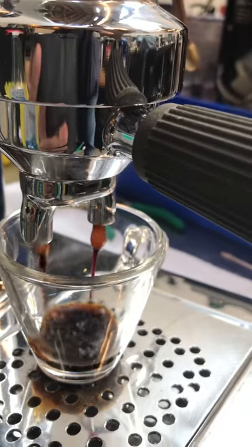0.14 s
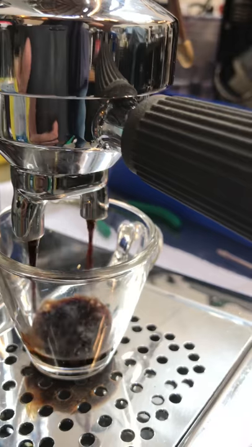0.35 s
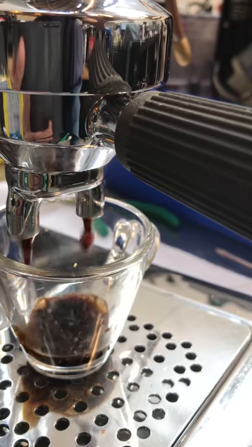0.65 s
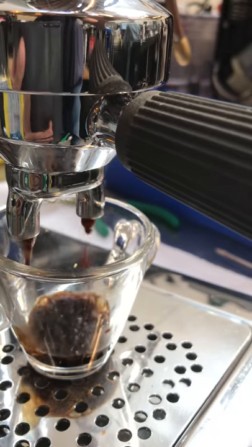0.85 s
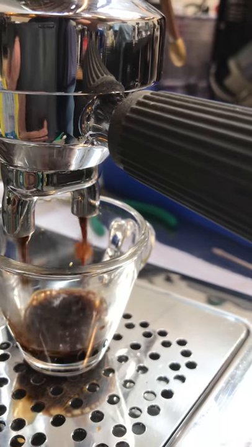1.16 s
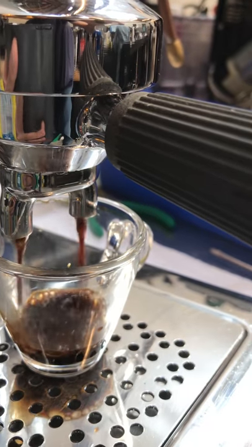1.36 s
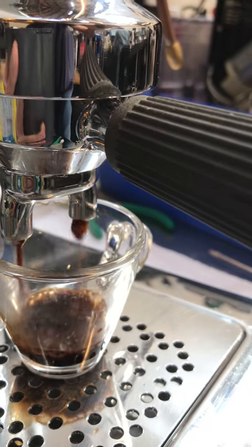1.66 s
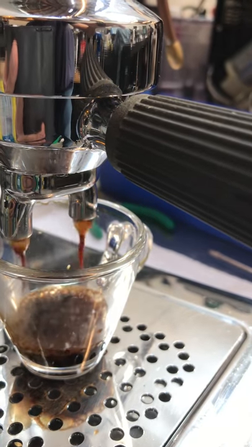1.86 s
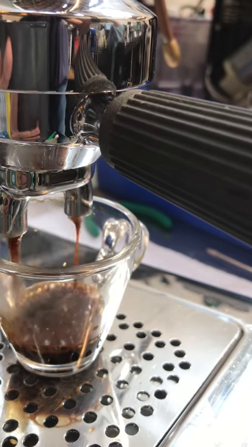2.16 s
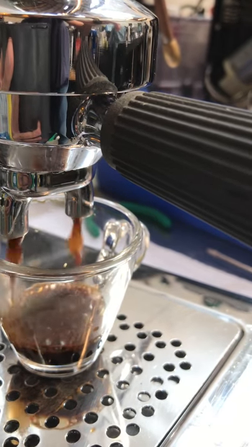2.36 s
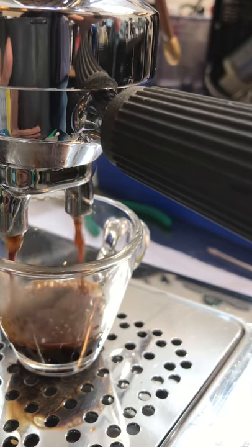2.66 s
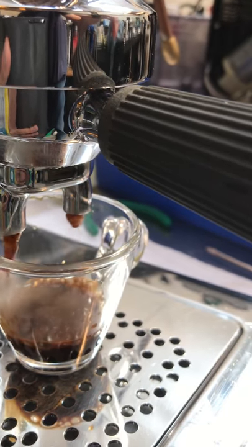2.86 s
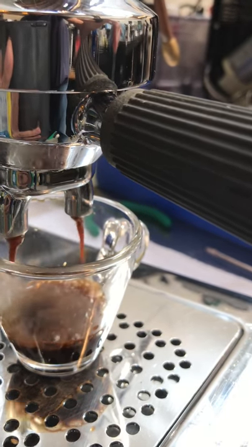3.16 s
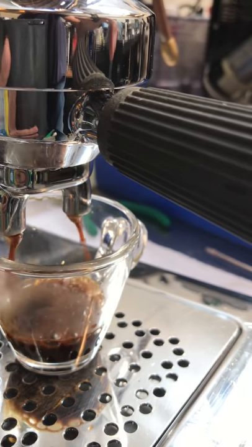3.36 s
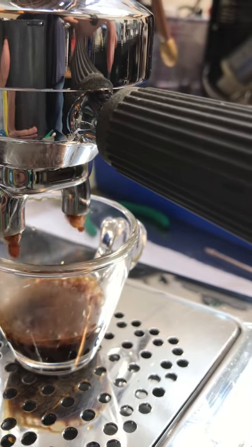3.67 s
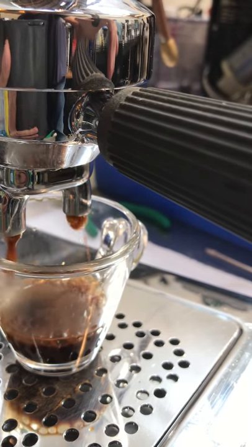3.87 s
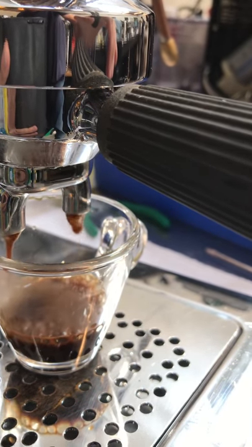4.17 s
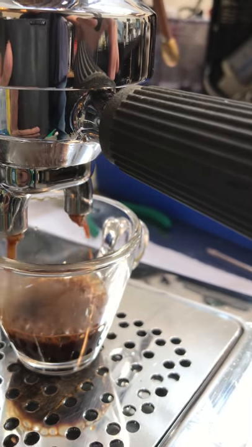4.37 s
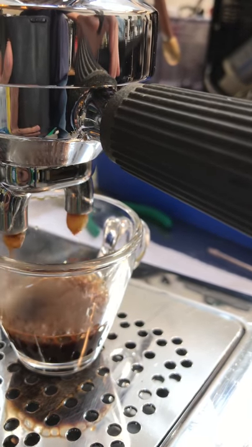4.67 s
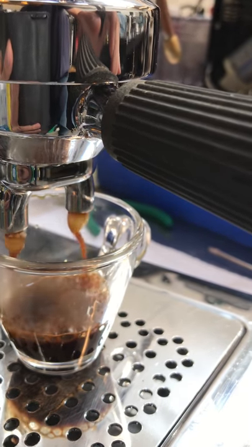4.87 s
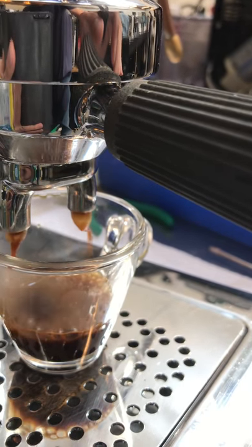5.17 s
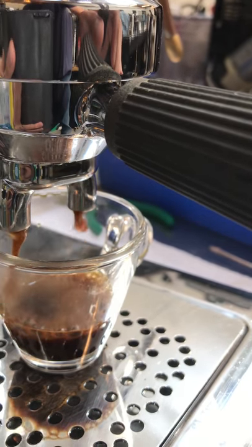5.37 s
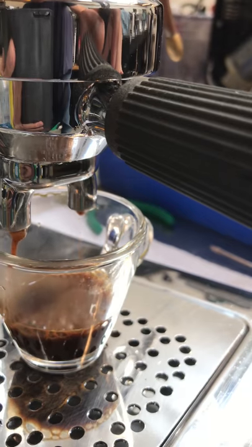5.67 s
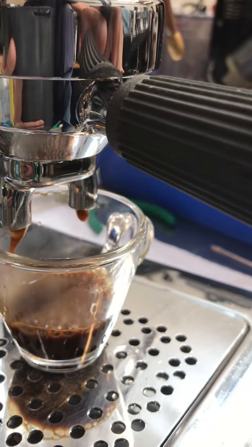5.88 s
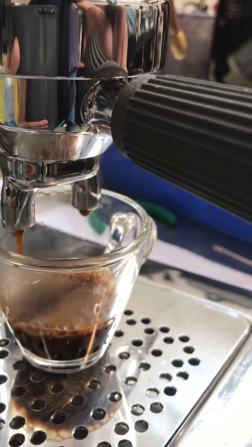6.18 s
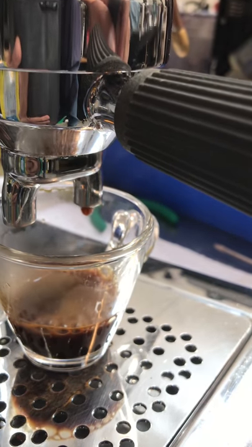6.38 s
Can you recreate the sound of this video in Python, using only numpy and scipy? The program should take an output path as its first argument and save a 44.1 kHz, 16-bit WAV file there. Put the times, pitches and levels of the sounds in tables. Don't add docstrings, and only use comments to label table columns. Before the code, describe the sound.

A phone microphone sits beside a glass catching coffee from two spouts: bright watery plinks, tiny splashes and crackling foam. Three quick air-gun bursts come early from farther off, the third longest and strongest. After a light tap, a low, boxy lid slam rings through the workshop. The dripping continues, gradually quieter and finer, over low ventilation, with a dull distant bump near five seconds and another near the end.

```python
import sys
import numpy as np
from scipy import signal
from scipy.fft import rfft, irfft, next_fast_len
from scipy.io import wavfile
from scipy.ndimage import uniform_filter1d, map_coordinates

SR = 44100
rng = np.random.default_rng(int(sys.argv[2]) if len(sys.argv) > 2 else 0)


def generate_wav(sig):
    pcm = np.round(np.clip(np.atleast_2d(sig).T, -1, 1) * 32767).astype(np.int16)
    wavfile.write(sys.argv[1], SR, pcm)


def invert_db(x):
    u = np.asarray(x, float) / 20
    return 10 ** u


N = 287973


def unit(x):
    return x / np.sqrt(np.mean(x ** 2) + 1e-20)


def along(points, hz):
    f, v = np.transpose(points)
    return np.interp(np.log(hz + 1), np.log(f + 1), v)


def curves(rows):
    s, *cols = np.transpose(rows)
    return [np.interp(np.arange(N) / SR, s, c) for c in cols]


def wobble(rate_hz):
    knots = rng.standard_normal(int(N * rate_hz / SR) + 4)
    return map_coordinates(knots, [np.arange(N) * rate_hz / SR])


def filtered(x, response):
    size = next_fast_len(N + SR // 2)
    spectrum = rfft(x, size) * response(np.fft.rfftfreq(size, 1 / SR))
    return irfft(spectrum, size)[:N]


def resonances(modes):
    def response(f):
        total = 0
        for k, (hz, width_hz, db) in enumerate(modes):
            damping = 1j * f * width_hz
            total = total + (-1) ** k * invert_db(db) * damping / (hz * hz - f * f + damping)
        return total
    return response


def rush(spectrum, patchy_db):
    z = signal.stft(rng.standard_normal(N + 512), nperseg=512)[2]
    field = uniform_filter1d(rng.standard_normal(z.shape), 5, axis=0)
    field = uniform_filter1d(field, 12, axis=1)
    noise = signal.istft(z * invert_db(patchy_db * unit(field)), nperseg=512)[1][:N]
    return unit(filtered(noise, lambda hz: invert_db(along(spectrum, hz))))


def placed(start_s, rows):
    index = np.round(start_s * SR).astype(int)[:, None] + np.arange(rows.shape[1])
    return np.bincount(index.ravel(), rows.ravel(), N + SR)[:N]


def bubbles(hz, t60_s, rise_s, climb, size=1300):
    t = np.arange(size) / SR
    phase = 2 * np.pi * hz[:, None] * (t + climb * t ** 2 / 2)
    return np.sin(phase) * invert_db(-60 * t / t60_s[:, None]) * (1 - np.exp(-t / rise_s))


def struck(parts):
    s, hz, db, t60_s, rise_s = np.transpose(parts)
    modes = bubbles(hz, t60_s, np.abs(rise_s[:, None]) + 1e-4, climb=0, size=SR // 3)
    return placed(s, invert_db(db)[:, None] * modes)


# frequency in Hz, t60 in seconds.
ROOM_T60 = [(100, 0.97), (300, 0.78), (1000, 0.8), (2500, 0.79), (6000, 0.61), (14000, 0.34)]


def room(x):
    hz, t, z = signal.stft(rng.standard_normal(SR), SR, nperseg=256)
    decay = invert_db(-60 * t / along(ROOM_T60, hz)[:, None])
    tail = rfft(signal.istft(z * decay, SR, nperseg=256)[1])
    tail = irfft(tail / np.sqrt(uniform_filter1d(np.abs(tail) ** 2, size=40)))
    delayed = np.pad(x, (400, 0))
    return signal.fftconvolve(delayed, tail[:SR - 4000] / np.linalg.norm(tail))[:N]


# time in seconds, level in dB.
TRICKLE_LEVEL = [(0, -62), (1.5, -75.5), (2.4, -72.5), (3.5, -81), (4.5, -82), (5.6, -77), (6.53, -87)]


def trickle(drop_s, drop_db, count=2000):
    chance = rng.random((count, 6))
    share = np.cumsum(invert_db(drop_db / 2))
    parent = np.searchsorted(share, chance[:, 4] * share[-1])
    near_s = drop_s[parent] + .07 * (chance[:, 0] - .3)
    s = np.where(chance[:, 5] < .5, near_s, chance[:, 0] * N / SR)
    hz = (3700 + 110 * s) * np.exp(1.3 * chance[:, 1] ** 3)
    size = invert_db(-4.6 * np.log(chance[:, 2] + .07)) * 4000 / hz
    t60_s = (12 + 25 * chance[:, 3]) / hz
    grains = size[:, None] * bubbles(hz, t60_s, rise_s=0.00021, climb=28, size=400)
    return invert_db(curves(TRICKLE_LEVEL)[0] + 0.37 * wobble(27)) * unit(placed(s, grains))


# frequency in Hz, density in dB per Hz.
RUMBLE_SPECTRUM = [(15, -28), (26, -3), (121, 0.5), (138, -2.5), (161, -5), (177, -11), (225, -6),
                   (300, -15), (385, -15.5), (450, -39), (580, -42), (990, -120)]
# frequency in Hz, density in dB per Hz.
HISS_SPECTRUM = [(240, -33), (400, 3), (786, -2.5), (945, -0.5), (1140, -3.5), (2070, -6), (2770, -10),
                 (4390, -10), (8110, -17), (10500, -18.5), (11900, -19), (15700, -22)]
# time in seconds, rumble in dB, hiss in dB.
VENT_LEVEL = [(0, -54, -63.5), (2, -55, -62), (4, -54, -64), (6.53, -53.5, -65)]
# frequency in Hz, width in Hz, level in dB.
DUCT_BANDS = [(224, 34, -70.5), (921, 41, -76.5), (1720, 36, -80)]
# multiple of twice the mains frequency, level in dB.
BUZZ_HARMONICS = [(5, -78), (8, -79.5), (9, -83.5), (11, -79.5), (12, -78.5), (17, -83.5)]
# start in seconds, frequency in Hz, level in dB, t60 in seconds, rise in seconds.
FAR_BUMPS = [
    (1.275, 1533, -43.5, 0.05, 0.0048),
    (4.985, 900, -52, 0.2, 0.023),
    (6.33, 937, -45.5, 0.12, 0.016),
]


def workshop():
    t = np.arange(N) / SR
    buzz_base_hz = 120.04
    rumble_db, hiss_db = curves(VENT_LEVEL)
    out = invert_db(rumble_db) * rush(RUMBLE_SPECTRUM, patchy_db=0.7)
    out = out + invert_db(hiss_db + .6 * wobble(3.46)) * rush(HISS_SPECTRUM, patchy_db=1.3)
    for hz, width_hz, db in DUCT_BANDS:
        band = filtered(rng.standard_normal(N), resonances([(hz, width_hz, 0)]))
        out = out + invert_db(db + 2.1 * wobble(7)) * unit(band)
    for k, db in BUZZ_HARMONICS:
        cycles = round(k) * buzz_base_hz * t + .15 * wobble(9)
        out = out + invert_db(db + 2.5 * wobble(5)) * np.sin(2 * np.pi * cycles)
    bumps = struck(FAR_BUMPS) * wobble(700)
    return out + bumps + invert_db(-1.5) * room(bumps)


# start in seconds, hold in seconds, level in dB, whistle in dB.
GUN_PUFFS = [
    (0.057, 0.031, -40.5, -53),
    (0.366, 0.041, -46.5, -58),
    (0.58, 0.056, -38.5, -80),
]
# frequency in Hz, density in dB per Hz.
JET_SPECTRUM = [(530, -56), (900, -26), (1620, -20), (1740, -17), (2100, -10.5), (2290, -3.5), (3010, -8.5),
                (4060, 0), (4800, -5.5), (5350, -2), (7040, -9.5), (8630, -7.5), (10300, -3), (11400, -8),
                (15700, -15.5)]
# frequency in Hz, width in Hz, level in dB.
NOZZLE_MODES = [(8600, 320, 0.5), (12500, 350, -12), (6150, 490, -1), (4250, 370, -6)]
# time in seconds, level in dB.
GUN_LEAKS = [
    (2.52, -69),
    (5.16, -71),
    (6.08, -74),
]


def air_gun():
    rise_db_s, fall_db_s, whistle_fall_db_s, leak_db_s = 602, 219, 137, 182
    swell_db_s = 26
    open_treble_db, dulling = 4.5, 2.9
    seep_db, seep_end_s = -64.5, 0.34
    t = np.arange(N) / SR
    jet = rush(JET_SPECTRUM, patchy_db=2)
    jet = jet + filtered(jet, resonances(NOZZLE_MODES))
    treble = filtered(jet, lambda hz: 1 / (1 + (8000 / (hz + 1)) ** 6))
    whistle = unit(filtered(rng.standard_normal(N), resonances([(6300, 150, 0)])))
    flow = invert_db(seep_db) * (t < seep_end_s) * jet
    tone = 0
    for s, held_s, db, whistle_db in GUN_PUFFS:
        early = np.clip(s - t, 0, None)
        late = np.clip(t - s - held_s, 0, None)
        held = np.clip(t - s, 0, held_s)
        treble_db = np.clip(open_treble_db - dulling * fall_db_s * late, -15, None)
        puff_db = db - rise_db_s * early + swell_db_s * held - fall_db_s * late
        flow = flow + invert_db(puff_db) * (jet + (invert_db(treble_db) - 1) * treble)
        tone = tone + invert_db(whistle_db - rise_db_s * early - whistle_fall_db_s * late)
    leaks = sum(invert_db(db - leak_db_s * np.abs(t - s)) for s, db in GUN_LEAKS)
    return invert_db(0.95 * wobble(61.9)) * flow + leaks * jet + tone * whistle


# start in seconds, level in dB, bubble in Hz, second bubble in Hz, spray in dB.
TWIN_DROPS = [(.1227, -22.5, 3880, 2760, -45), (.2357, -17.5, 2790, 3900, -44),
              (.3063, -27.5, 4900, 8600, -45), (.5203, -25, 3760, 2600, -60),
              (.5854, -15.5, 4400, 2670, -41), (1.1424, -20.5, 4330, 5600, -50),
              (1.2272, -24, 3630, 4670, -69), (1.3132, -15.5, 2270, 6530, -52),
              (1.542, -28.5, 4650, 3130, -76), (1.6338, -32.5, 4600, 3320, -46),
              (1.6542, -27.5, 2460, 4930, -64), (1.6909, -34, 2430, 4040, -60),
              (2.1424, -27, 2830, 4860, -61), (2.1476, -30.5, 3080, 5540, -59),
              (2.2713, -26, 5100, 3900, -34), (2.7126, -35.5, 6560, 5840, -41),
              (2.9558, -28, 4270, 2650, -53), (3.1172, -29.5, 3830, 4740, -57),
              (3.2379, -26, 4760, 8300, -41), (3.3811, -31.5, 4040, 5000, -68),
              (3.4646, -33, 7500, 5900, -53), (4.301, -32, 6660, 3020, -49), (4.945, -29, 4730, 8140, -61),
              (6.29, -31.5, 7450, 4270, -46)]
# start in seconds, level in dB, bubble in Hz, spray in dB.
PLINK_DROPS = [(.33, -15, 2440, -70), (.3941, -38.5, 3510, -52), (.5705, -15.5, 4200, -46),
               (0.9786, -28.5, 4470, -44), (1.0472, -28, 4500, -70), (1.3639, -28, 5820, -71),
               (1.9382, -36.5, 6160, -62), (2.029, -40.5, 4400, -55), (2.3128, -33.5, 4650, -73),
               (2.3329, -34.5, 4130, -71), (2.537, -37.5, 2540, -56), (2.5911, -32, 4700, -67),
               (2.7436, -34, 4750, -52), (2.8226, -31, 4380, -75), (3.2121, -19.5, 4650, -47),
               (3.232, -29, 4040, -64), (3.5277, -29.5, 4550, -52), (3.6014, -39.5, 7240, -67),
               (3.7487, -37.5, 4300, -52), (4.284, -41, 4100, -58), (4.5638, -26, 2180, -54),
               (4.7836, -44, 4650, -61), (5.068, -39.5, 2350, -60), (5.2218, -27, 4650, -65),
               (5.362, -38, 5500, -60), (5.4343, -41, 4340, -52.5), (5.5955, -31, 4350, -64),
               (5.6958, -25.5, 4780, -71), (6.241, -39.5, 2570, -63)]
# start in seconds, level in dB, bubble in Hz.
SHALLOW_DRIPS = [(.3213, -27.5, 3740), (.8461, -35, 3600), (.9057, -37.5, 4680), (1.3846, -34, 3780),
                 (1.446, -43.5, 4210), (1.4627, -46.5, 5130), (1.5023, -35, 3920), (1.7039, -42, 4610),
                 (1.7767, -34, 4500), (2.1052, -42, 6610), (2.1337, -49, 2210), (2.1698, -36, 3750),
                 (2.191, -39.5, 3650), (2.1983, -36, 3950), (2.219, -44, 4300), (2.2495, -43.5, 4700),
                 (2.297, -35.5, 4570), (2.3015, -40, 4200), (2.4135, -52, 8800), (2.3449, -46.5, 3130),
                 (2.5582, -40, 3500), (2.7335, -38, 3930), (2.7767, -37, 4570), (2.7862, -37, 3700),
                 (3.1117, -40.5, 3930), (3.2623, -61, 3930), (3.2978, -43.5, 4690), (3.3419, -40.5, 4740),
                 (3.3681, -39, 4250), (3.3993, -33.5, 4700)]
# start in seconds, level in dB, bubble in Hz.
FOAMY_DRIPS = [(3.7016, -45, 3900), (3.8809, -46, 4530), (3.8907, -43.5, 4800), (4.0845, -40.5, 3840),
               (4.1166, -40.5, 4650), (4.1406, -43, 4180), (4.1486, -35.5, 4280), (4.3838, -41, 3800),
               (4.4037, -46, 3930), (4.4437, -37, 4600), (4.5504, -39, 2110), (4.7594, -44.5, 4130),
               (4.965, -40.5, 4260), (4.9804, -41.5, 4200), (5.1234, -44, 4850), (5.138, -47.5, 4700),
               (5.148, -46.5, 4160), (5.285, -49, 4650), (5.4541, -41.5, 6460), (5.5599, -42.5, 4550),
               (5.5995, -36.5, 4100), (5.6798, -46, 4760), (5.6898, -39.5, 4730), (5.712, -42, 4680),
               (5.718, -42.5, 4400), (5.727, -46, 4970), (5.747, -52, 5600), (5.7689, -50, 6230),
               (6.1296, -44, 4570)]
# start in seconds, level in dB, bubble in Hz.
BRIGHT_SPITS = [(.2826, -45.5, 6950), (0.299, -32.5, 11000), (.3245, -42, 12700), (1.094, -38, 7850),
                (1.8272, -37.5, 6700), (1.9163, -29.5, 11700), (2.431, -49.5, 7360), (2.6273, -48, 6080),
                (2.8006, -34, 8700), (2.8094, -58, 11110), (2.8755, -43.5, 6840), (3.1574, -40, 9000),
                (3.288, -42.5, 7560), (3.406, -45.5, 7300), (3.5486, -38.5, 6650), (3.621, -41.5, 11900),
                (3.7527, -46, 7880), (3.7725, -45.5, 7870), (4.0371, -45.5, 8140), (4.1072, -47.5, 7900),
                (4.1705, -44, 8300), (4.1932, -50.5, 7980), (4.3266, -43.5, 8600), (4.379, -45.5, 8250),
                (4.4786, -44.5, 8600), (4.5122, -56.5, 6750), (4.5424, -40, 12200), (5.588, -42, 6550),
                (6.019, -45, 9140), (6.041, -58, 11600), (6.3229, -49, 6740)]


def all_drops():
    twin, plink, spit = (np.transpose(rows) for rows in (TWIN_DROPS, PLINK_DROPS, BRIGHT_SPITS))
    drip = np.transpose(list(SHALLOW_DRIPS) + list(FOAMY_DRIPS))
    s, db, hz = (np.concatenate([twin[k], plink[k], drip[k], spit[k]]) for k in range(3))
    second_db = np.concatenate([twin[1] - 4.5, plink[1] - 27.5, drip[1] - 7.5, spit[1] - 6.5])
    spray_db = np.concatenate([twin[4], plink[3], drip[1] - 40, spit[1] - 13])
    spread = np.exp(0.255 * rng.standard_normal(len(s)).clip(-2, 2))
    stray_hz = np.maximum(0.822 * hz, 5000) * spread
    second_hz = np.concatenate([twin[3], stray_hz[twin.shape[1]:]])
    return s, db, hz, second_db, second_hz, spray_db


def drop_bubbles(s, db, hz):
    snap_db, snap_s = 9, .0016
    large = 4500 / hz
    rough = 1 + 1.9 * uniform_filter1d(rng.standard_normal((len(hz), 1300)), size=32, axis=1)
    snap = 1 + invert_db(snap_db) * np.exp(-np.arange(1300) / SR / snap_s)
    t60_s = 0.015 * large ** 1.74 / (1 + s / 12)
    climb = (21 * large ** 1.3 / (1 + s / 4))[:, None]
    tones = bubbles(0.973 * hz, t60_s, rise_s=0.00052, climb=climb)
    return (invert_db(db - 13) / large ** 1.25)[:, None] * tones * rough * snap


def splash(s, db, t60_s, band_hz):
    t = np.arange(400) / SR
    decay = invert_db(-60 * t / t60_s) + invert_db(-20.5 - 60 * t / 0.044)
    bursts = invert_db(db)[:, None] * rng.standard_normal((len(s), 400)) * decay
    return signal.lfilter(*signal.butter(3, band_hz, "bandpass", fs=SR), placed(s, bursts))


# frequency in Hz, width in Hz, level in dB, scatter in dB.
GLASS_MODES = [(3750, 120, -27, 2), (4650, 180, 2, 15), (6270, 370, 1, 21.5)]


def drops(s, db, hz, second_db, second_hz, spray_db):
    chance = rng.standard_normal((len(s), 8))
    ring = 0
    for k, (mode_hz, width_hz, level_db, scatter_db) in enumerate(GLASS_MODES):
        gain = invert_db(level_db + scatter_db * chance[:, [k]].clip(-2, .8))
        detuned_hz = mode_hz * (1 + 0.079 * chance[:, k + 4])
        ring = ring + gain * bubbles(detuned_hz, 3.26 / width_hz + 0 * s, rise_s=0.0012, climb=2.2)
    body = invert_db(db - 27.0)[:, None] * ring
    body = body + drop_bubbles(s, db, hz) + drop_bubbles(s, second_db, second_hz)
    slap = splash(s, second_db - 0.5, t60_s=0.00095, band_hz=[3400, 7000])
    spray = splash(s, spray_db + 8, t60_s=.0045, band_hz=[6000, 13000])
    return placed(s, body) + slap + spray


# start in seconds, level in dB, bubble in Hz.
STRAY_DROPLETS = [(0.9899, -54, 4370), (0.9949, -55, 3920), (1.0036, -56.4, 4130), (1.2057, -55, 6290),
                  (1.2787, -56.8, 3920), (1.361, -43, 3750), (1.404, -54, 3750), (1.4633, -55, 4220),
                  (1.4803, -54.7, 4610), (1.5758, -56.9, 5040), (1.5923, -59.2, 4130), (1.6649, -51, 3750),
                  (1.6758, -53.4, 4570), (1.6833, -55, 3920), (1.8836, -46, 4050), (2.0041, -62, 4650),
                  (2.0188, -59.1, 4610), (2.0295, -59, 4260), (2.0944, -58.2, 4350), (2.1343, -49, 4780),
                  (2.2104, -60, 3700), (2.2603, -60, 3920), (2.379, -55, 6140), (2.3852, -56, 5080),
                  (2.4044, -56, 3320), (2.5379, -54, 3790), (2.7062, -53, 3750), (2.8315, -61, 5040),
                  (2.9465, -59, 3880), (3.0442, -60, 3700), (3.1335, -59.0, 4390), (3.174, -56, 4570),
                  (3.262, -52, 4050), (3.3146, -57.4, 4740), (3.3296, -56, 5730), (3.5047, -59.3, 3570),
                  (3.6015, -55, 4520), (3.7332, -60.4, 4690), (3.8988, -58.1, 4820), (3.9489, -60, 4520),
                  (4.125, -65, 4390), (4.2111, -66, 4310), (4.4493, -60.4, 4440), (4.5965, -59.5, 5900),
                  (4.703, -67, 4650), (4.8708, -62, 4130), (4.9082, -59, 4310), (4.9654, -50.8, 4260),
                  (4.9814, -54, 4260), (4.9968, -56, 5770), (5.0973, -58, 4650), (5.2328, -60.8, 4570),
                  (5.5672, -61.0, 4310), (5.5747, -58, 4740), (5.5949, -43.5, 4570), (5.6368, -64, 4440),
                  (5.6668, -56.8, 4740), (5.7027, -60.1, 4130), (5.7526, -61.5, 6160), (6.2998, -56, 3230)]
# start in seconds, level in dB, note in Hz.
FOAM_POPS = [(1.1041, -57.9, 7150), (1.3234, -60, 7150), (1.4558, -63, 7150), (1.9163, -38, 12190),
             (2.134, -62, 7150), (2.1425, -54, 7200), (2.161, -61.9, 7280), (2.1869, -62.5, 11500),
             (2.1999, -60, 7150), (2.8098, -58.4, 10940), (2.9467, -64.4, 9170), (3.0472, -60, 8570),
             (3.0525, -65.3, 8140), (3.0719, -62, 8440), (3.1477, -61.5, 7840), (3.5693, -58.6, 8310),
             (3.6653, -60.7, 7150), (3.8711, -64.4, 7970), (3.899, -62.0, 9260), (3.9145, -59, 7150),
             (3.9427, -63.6, 11710), (4.0006, -61.3, 7670), (4.0307, -61.8, 8140), (4.0442, -65.0, 11710),
             (4.0734, -63.9, 7920), (4.1333, -62.4, 7540), (4.2111, -63.9, 7150), (4.342, -62.8, 8700),
             (4.5126, -56, 11840), (4.5506, -58.7, 7320), (4.5718, -61.9, 8100), (4.703, -61.4, 8230),
             (4.7406, -63.9, 8570), (4.7795, -60.6, 14430), (4.8362, -60, 7970), (4.8796, -64.2, 7150),
             (4.8915, -64, 8100), (4.9082, -61, 7150), (4.9654, -61.4, 7240), (4.9868, -62.1, 8310),
             (5.0761, -63.0, 7150), (5.0958, -59, 7920), (5.3954, -60.7, 7490), (5.4049, -58, 7580),
             (5.4919, -61.9, 7450), (5.5326, -60.9, 7490), (5.5553, -63.2, 7580), (5.5954, -49, 7700),
             (5.6037, -65.1, 11760), (5.6665, -64.1, 11890), (5.769, -65, 7670), (5.8045, -62, 9090),
             (5.879, -66.0, 8740), (5.895, -64.3, 7620), (5.9643, -57, 11460), (6.0414, -58, 12100),
             (6.0896, -61, 8400), (6.1522, -60.6, 7150), (6.2734, -62.4, 7580), (6.2983, -60.6, 9220)]


def droplets():
    s, db, hz = np.transpose(STRAY_DROPLETS)
    pop_s, pop_db, pop_hz = np.transpose(FOAM_POPS)
    rough = 1 + 1.1 * uniform_filter1d(rng.standard_normal((len(s), 500)), size=14, axis=1)
    notes = invert_db(db + 8)[:, None] * rough * bubbles(hz, 27 / hz, rise_s=0.00023, climb=15, size=500)
    pops = invert_db(pop_db + 17)[:, None] * bubbles(pop_hz, 20 / pop_hz, rise_s=.0002, climb=30, size=200)
    hiss = splash(pop_s, pop_db + 1.5, t60_s=0.003, band_hz=[5500, 13500])
    return placed(s, notes) + placed(pop_s, pops) + hiss


def foam(count=280):
    base_db, grows_db_s, spread_db = -60.5, .5, 2.5
    chance = rng.random((count, 2))
    s = 1 + chance[:, 0] * (N / SR - 1)
    db = base_db + grows_db_s * s - spread_db * np.log(chance[:, 1] + .3)
    return splash(s, db, t60_s=.003, band_hz=[5000, 9800])


# start in seconds, frequency in Hz, level in dB, t60 in seconds, rise in seconds.
LID_MODES = [(1.7268, 3970, -36.5, 0.019, .0005), (1.7305, 638, -19, 0.068, 0.0027),
             (1.743, 700, -25, 0.08, 0.003), (1.7315, 513, -22.5, 0.087, 0.0032),
             (1.7325, 889, -30.5, 0.13, 0.0031), (1.7339, 1473, -33, 0.067, 0.0014),
             (1.9, 1190, -48, 0.029, 0.0062), (1.7395, 282.7, -9, 0.077, 0.007),
             (1.766, 189, -18, 0.059, 0.005), (1.7420, 219, -23, 0.13, 0.013),
             (1.7450, 95.8, -27, 0.18, 0.0064), (1.751, 2850, -32.5, 0.035, 0.002)]
# frequency in Hz, density in dB per Hz.
SLAM_SPECTRUM = [(30, -20), (60, -2), (110, -1.5), (165, -6.5), (290, -1), (400, -12), (650, -4.5),
                 (1200, -12), (2100, -22), (3400, -30.5), (4050, -23), (5200, -36), (9000, -36.5),
                 (15700, -54)]


def lid():
    hz, t, z = signal.stft(rush(SLAM_SPECTRUM, patchy_db=0.0)[:SR], SR, nperseg=256)
    quick = invert_db(-60 * t / 0.072)
    slow = invert_db(-3.5 - 60 * t / along(ROOM_T60, hz)[:, None])
    roar = signal.istft(z * (quick + slow), SR, nperseg=256)[1][:SR]
    roar = roar * (1 - np.exp(-np.arange(SR) / SR / 0.0037))
    return struck(LID_MODES) + invert_db(-26) * placed(np.array([1.7312]), roar[None])


# start in seconds, frequency in Hz, level in dB, t60 in seconds, climb per second.
SPOUT_SQUEAK = (2.168, 12200, -66, .09, .8)


def squeak():
    s, hz, db, t60_s, climb = SPOUT_SQUEAK
    tone = bubbles(np.array([hz]), np.array([t60_s]), rise_s=.01, climb=climb, size=2400)
    return placed(np.array([s]), invert_db(db) * tone)


def scene():
    falling = all_drops()
    water = trickle(*falling[:2]) + drops(*falling) + droplets() + foam() + squeak()
    gun = air_gun()
    mono = water + invert_db(-26.5) * room(water) + gun + invert_db(-2.0) * room(gun) + lid() + workshop()
    return np.array([mono, mono])


def low_pass(x):
    return signal.sosfilt(signal.butter(12, 16660, fs=SR, output="sos"), x)


# frequency in Hz, width in Hz, level in dB.
MIC_NOTCH = (10470, 610, -5)


def record(dry):
    ceiling, top_hz = .175, 15800
    dip_hz, width_hz, dip_db = MIC_NOTCH
    mono = dry[0] / (1 + np.abs(dry[0] / ceiling) ** 5) ** (1 / 5)

    def microphone(hz):
        dip = invert_db(dip_db * np.exp(-((hz - dip_hz) / width_hz) ** 2))
        return dip * (hz > 26) * (hz < 16500)

    mono = filtered(mono, microphone)
    top = filtered(mono, lambda hz: np.clip((hz - top_hz) / 200 + 1, 0, 1))
    power = filtered(mono, lambda hz: hz > 7000) ** 2
    attack = uniform_filter1d(power, size=90) > 13 * uniform_filter1d(power, size=2000)
    gate = uniform_filter1d(uniform_filter1d(attack * 1., size=200), size=200)
    mono = mono - top * (1 - np.clip(4 * gate, 0, 1))
    return low_pass(np.array([mono, mono]))


dry = scene()
out = record(dry)
generate_wav(out)
```